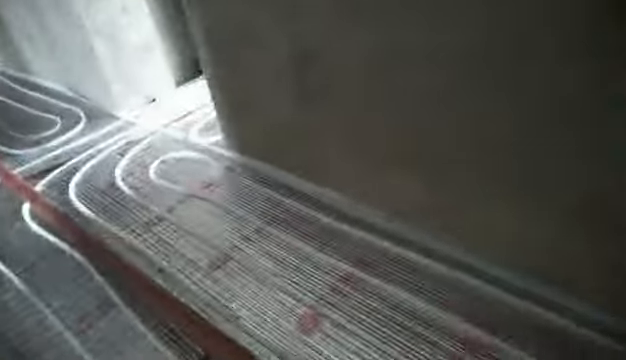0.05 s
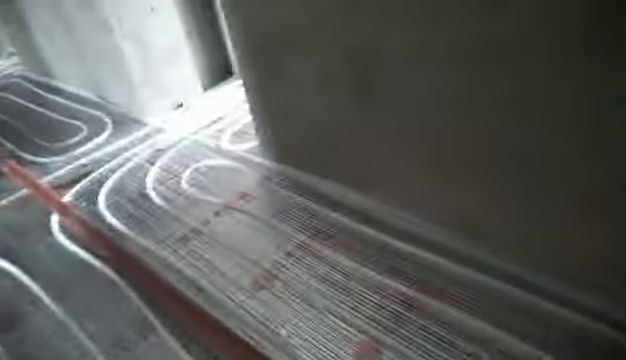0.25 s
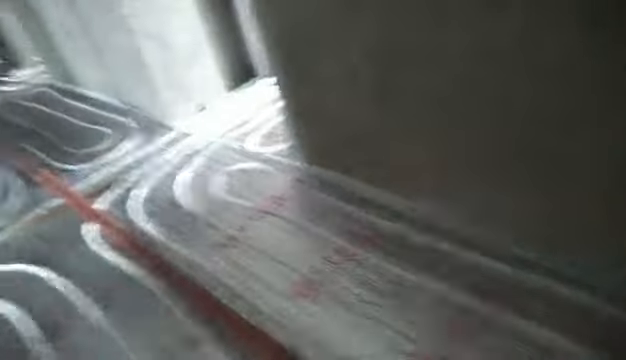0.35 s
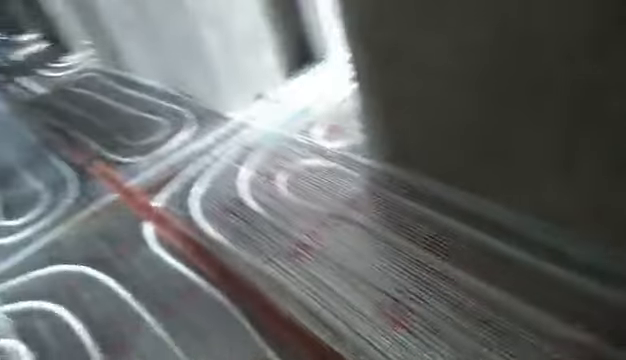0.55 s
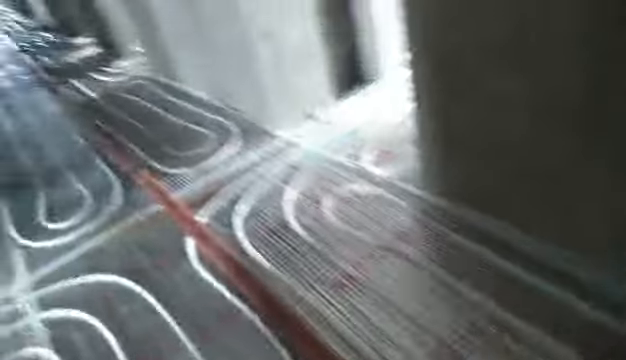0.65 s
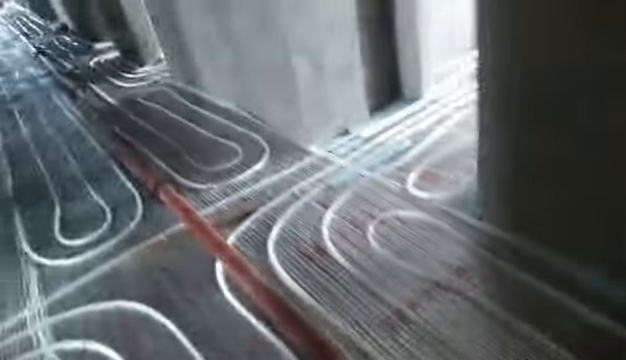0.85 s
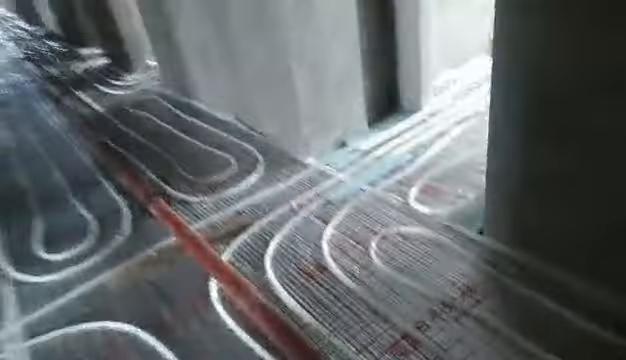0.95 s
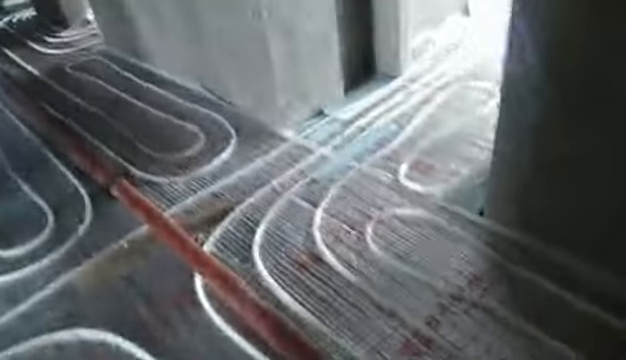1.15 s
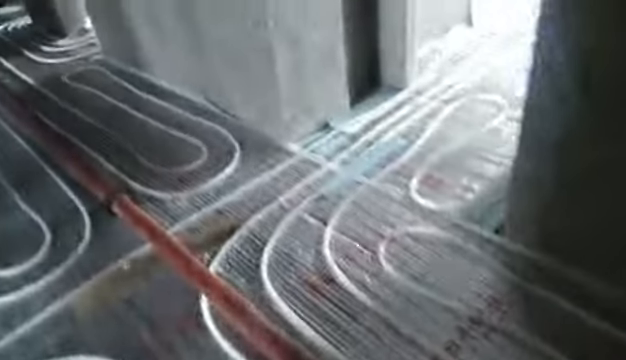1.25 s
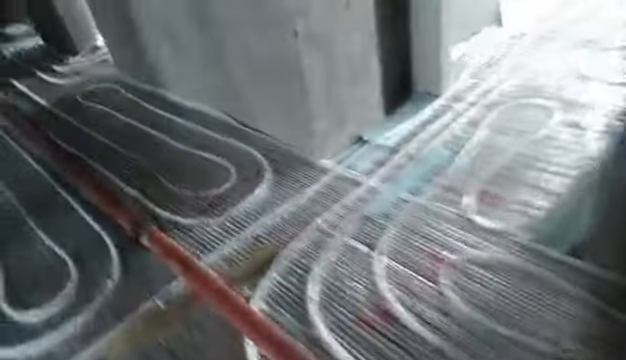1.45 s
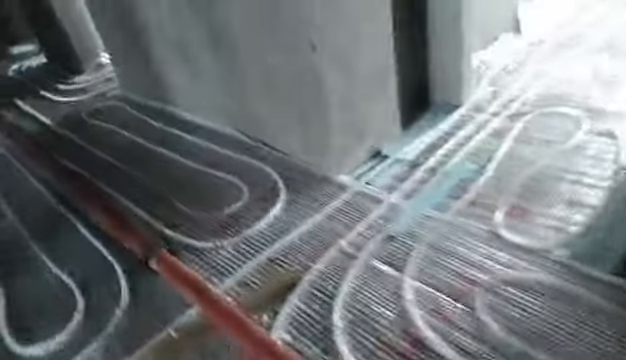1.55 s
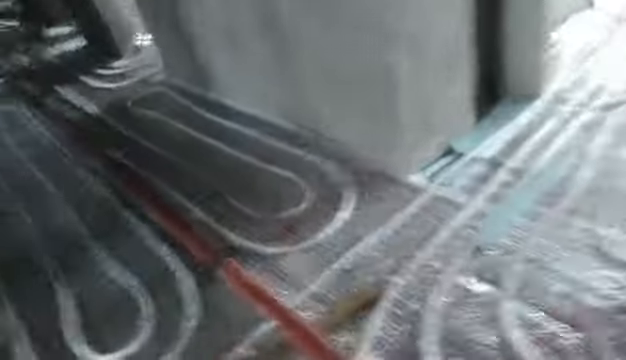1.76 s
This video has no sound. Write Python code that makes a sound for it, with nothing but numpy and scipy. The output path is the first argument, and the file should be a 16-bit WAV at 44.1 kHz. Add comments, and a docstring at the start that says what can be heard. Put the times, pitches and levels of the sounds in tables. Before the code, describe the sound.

Wet concrete is pumped through a hose, off to the left in a bare room. A valve clacks with a puff of air at 0.2 seconds. The hose groans around 0.5, then knocks, rumbles and squelches, with air spurting at 0.7 and leaking on. At 1.3 seconds comes a harder ringing clack and air blast, and grit scrapes along the humming hose until 1.8, over faint distant machinery.

```python
"""One slug of wet concrete, pumped through a hose across the floor of a bare concrete building.
A valve clacks with a puff of air; the hose groans, then knocks and rumbles as the slug squelches past;
air spurts and leaks on. A second, harder clack and blast leave grit scraping along the humming hose.
Heard from a closely spaced pair of microphones, everything to the left, machinery in the distance."""
import sys
import numpy as np
from scipy import signal
from scipy.fft import rfft, irfft
from scipy.io import wavfile
from scipy.ndimage import uniform_filter1d

SR = 44100
rng = np.random.default_rng(int(sys.argv[2]) if len(sys.argv) > 2 else 0)


def unload_wav(signal):
    """Save mono or channel-first audio to the path in sys.argv[1] as 16-bit WAV at rate SR, clipped to [-1, 1]."""
    wavfile.write(
        sys.argv[1],
        SR,
        np.round(np.clip(np.atleast_2d(signal).T, -1, 1) * 32767).astype(np.int16),
    )


N = 79380
T = np.arange(N) / SR
FREQS = np.maximum(np.fft.rfftfreq(2 * N, 1 / SR), 1)


def undb(db):
    """Decibels to gain."""
    return 10 ** (np.asarray(db) / 20)


def unit(x):
    """Scale to rms 1."""
    return x / np.sqrt(np.mean(x ** 2))


def curve(rows, column=1):
    """One column of a time table, joined by straight lines."""
    rows = np.array(rows)
    return np.interp(T, rows[:, 0], rows[:, column])


def across(points):
    """A table of freq_hz, value spread over log frequency."""
    points = np.array(points)
    return np.interp(np.log(FREQS), np.log(points[:, 0]), points[:, 1])


def shape(x, gain):
    """Filter by a gain per frequency."""
    return irfft(rfft(x, 2 * N) * gain)[..., :N]


def colour(x, spectrum):
    """Causal filter from a table of freq_hz, level_db."""
    cepstrum = irfft(np.log(undb(across(spectrum))))
    cepstrum[1:N] *= 2
    cepstrum[N + 1:] = 0
    return shape(x, np.exp(rfft(cepstrum)))


def resonances(rows):
    """Summed frequency response of damped resonances."""
    return sum(undb(db) / (1 + 2j * (FREQS - hz) / width) for hz, width, db in rows)


def mic_pair(pair):
    """Make two unrelated signals alike in the bass, as at two closely spaced microphones."""
    # likeness of left and right: freq_hz, correlation
    likeness = [(100, 0.92), (300, .95), (700, .6), (1500, 0.12), (8000, 0.12)]
    alike = np.clip(across(likeness), 0, 1)
    mid = shape(pair[0], np.sqrt((1 + alike) / 2))
    side = shape(pair[1], np.sqrt((1 - alike) / 2))
    return np.array([mid + side, mid - side])


def noise(spectrum):
    """Diffuse coloured noise, rms 1."""
    return unit(colour(mic_pair(rng.standard_normal((2, N))), spectrum))


def wander(rate_hz):
    """Smooth random drift, spread near 1."""
    span = max(int(SR / rate_hz), 1)
    steps = np.repeat(rng.standard_normal(N)[:N // span + 1], span)
    return 1.3 * uniform_filter1d(uniform_filter1d(steps, span), span)[:N]


def fade(start, decay_s):
    """Sudden start and exponential decay."""
    return (T >= start) * np.exp(-np.maximum(T - start, 0) / decay_s)


def room(x, wet_db, t60_s=0.41, build_s=0.015):
    """Direct sound plus the echo of bare concrete walls."""
    build = 1 - np.exp(-(T / build_s) ** 2)
    tail = mic_pair(rng.standard_normal((2, N))) * undb(-60 * T / t60_s) * build
    return x + undb(wet_db) * shape(x, rfft(unit(tail) / np.sqrt(N), 2 * N))


def machinery(level_db=-63):
    """Distant machinery lays a steady low noise under everything."""
    # machinery spectrum: freq_hz, level_db
    spectrum = [(25, 17), (55, 9.5), (110, -12), (400, 2), (750, -5), (1200, -3), (1600, -9), (2100, -5.5),
                (3200, -10.5), (7000, -11), (10000, -20.5), (14000, -28)]
    return undb(level_db) * noise(spectrum)


def air_leak():
    """A thin leak hisses at the coupling."""
    # strength of the leak: time_s, level_db
    levels = [(0, -98), (0.3, -76), (0.39, -62), (0.47, -82), (0.63, -69), (0.69, -59.5), (0.76, -42),
              (0.95, -56), (1.2, -57.5), (1.55, -55.5), (1.72, -54.5), (1.8, -58.5)]
    # hiss spectrum: freq_hz, level_db
    spectrum = [(500, -18), (1600, -7), (2300, -2), (3200, -9), (4800, -3.5), (5300, 4), (5900, -0.5),
                (6500, -10), (7300, -11.5), (8200, -17.5), (14000, -27)]
    return noise(spectrum) * undb(curve(levels) + 0.49 * wander(25))


def air_bursts(shut_s=0.03):
    """Escaping air swells, holds and falls away, cut short when the valve shuts."""
    # bursts of air: start_s, attack_s, hold_s, fall_db_per_s, level_db, open_s
    bursts = [(0.204, 0.012, 0.024, 179, -41, 0.31), (0.723, 0.037, 0.015, 61, -37.5, 0.362),
              (1.294, 0.036, 0.0057, 153, -29, 0.2)]
    # one spectrum per burst: freq_hz, level_db
    spectra = [
        [(100, 0), (400, -1.5), (900, 8.5), (1200, -1.5), (2000, 8.5), (2700, -3), (3800, -3.5), (5200, -9.5),
         (6700, -3), (10000, -2.5), (14000, -12.5)],
        [(200, -1), (900, -40), (1700, -8), (2400, -5.5), (3300, -10.5), (4800, -8.5), (5400, 0.5), (7000, 0),
         (10500, -5.5), (14000, -15.5)],
        [(150, -3), (450, -26), (900, -9), (1300, 4), (2000, -7), (2700, -5), (4700, -3), (5400, 0), (7600, -2),
         (10500, -5.5), (14000, -15)],
    ]
    air = 0
    for (start, attack, hold, fall, db, open_s), spectrum in zip(bursts, spectra):
        rise = np.clip((T - start) / attack, 0, 1)
        level = undb(db - fall * np.maximum(T - start - attack - hold, 0))
        shut = np.exp(-np.maximum(T - start - open_s, 0) / shut_s)
        air = air + rise * level * shut * noise(spectrum)
    return air * undb(0.8 * wander(220))


def steel_ring(centre_hz, span_octaves=0.45):
    """The steel's modes ring, strongest around the pitch that the blow favours."""
    # modes of valve and coupling: pitch_hz, level_db, t60_s
    modes = [(1394, -4, 0.11), (1400, -21, 0.19), (1365, -3.5, .14), (1507, -9.5, 0.15), (1792, -26, .15),
             (1812, -6, 0.15), (1876, -3, 0.11), (2008, 1.5, 0.053), (2020, -1, 0.06), (2204, -3, 0.12),
             (2120, 0, .18), (2890, -10, 0.13)]
    weights = [undb(db) / (1 + (np.log2(hz / centre_hz) / span_octaves) ** 4) for hz, db, _ in modes]
    ring = sum(weight * undb(-60 * T / t60) * np.sin(2 * np.pi * (hz * T + rng.random((2, 1))))
               for weight, (hz, _, t60) in zip(weights, modes))
    return ring / np.sqrt(np.sum(np.square(weights)) / 2)


def valve(crack_s=0.0028, thud_s=0.014, contact_s=0.0058):
    """Each clack is a sharp crack, a dull thud and a chattering contact that rings the steel."""
    # clacks and rebounds: start_s, crack_db, ring_db, ring_centre_hz, thud_db
    clacks = [(0.2069, -50.5, -38.5, 2100, -41.5), (0.2213, -54, -41.5, 1880, -50),
              (1.3033, -21, -26.5, 1820, -60), (1.3085, -27.5, -38, 1930, -50),
              (1.318, -31, -29, 1430, -35)]
    # spectra of crack and thud: freq_hz, level_db
    crack_spectrum = [(600, -39), (1500, 6), (2100, -4), (3000, -25), (4500, -12.5), (5600, 3), (8500, -2),
                      (14000, -11)]
    thud_spectrum = [(80, 0), (300, 0), (800, -1.5), (1100, -5), (2000, -20)]
    crack, thud = noise(crack_spectrum), noise(thud_spectrum)
    blows, rings = 0, 0
    for start, crack_db, ring_db, centre_hz, thud_db in clacks:
        blows = blows + undb(crack_db) * crack * fade(start, crack_s)
        blows = blows + undb(thud_db) * thud * fade(start, thud_s)
        chatter = unit(rng.standard_normal((2, N)) * fade(start, contact_s)) / np.sqrt(N)
        rings = rings + undb(ring_db) * shape(chatter, rfft(steel_ring(centre_hz), 2 * N))
    return room(blows, wet_db=-3) + room(rings, wet_db=-5.5)


def wall_tone(rows, unrest, jitter=0.022, flutter_db=4.2):
    """The hose wall sticks and slips: a tone with weak overtones; unrest scales jitter and flutter."""
    pitch_hz = curve(rows) * (1 + unrest * jitter * wander(90))
    phase = 2 * np.pi * np.cumsum(pitch_hz) / SR
    tone = np.sin(phase) + undb(-25.5) * np.sin(2 * phase) + undb(-41) * np.sin(3 * phase)
    sounding = (T > rows[0][0]) & (T < rows[-1][0])
    return unit(tone) * sounding * undb(curve(rows, column=2) + unrest * flutter_db * wander(70))


def hose_hum(upper_ratio=1.29, upper_db=-12.5):
    """The emptied hose hums on two resonances, steadier than its groan."""
    # lower resonance: time_s, pitch_hz, level_db
    lower = [(1.219, 269.8, -53.5), (1.282, 266, -55), (1.332, 265.3, -37), (1.39, 258.8, -48),
             (1.44, 260.8, -55), (1.495, 259.4, -38), (1.56, 264.1, -42), (1.62, 255.2, -43),
             (1.702, 263.7, -48), (1.8, 264, -68)]
    upper = [(s, hz * upper_ratio, db + upper_db) for s, hz, db in lower]
    return wall_tone(lower, unrest=0.5) + wall_tone(upper, unrest=0.5)


def hose_groan():
    """The hose wall groans in stick-slip surges."""
    # course of the groan: time_s, pitch_hz, level_db
    groan = [(0.325, 292.3, -59), (0.365, 298.7, -52.5), (0.38, 300.4, -37), (0.42, 292, -54),
             (0.46, 286.2, -26.5), (0.488, 276, -47), (0.505, 284.5, -28), (0.52, 282.4, -44),
             (0.535, 275, -22), (0.552, 276.6, -61), (0.7, 285.5, -59), (0.95, 292.5, -46)]
    return wall_tone(groan, unrest=1)


def hose_knocks(rise_s=0.0051, thump_s=0.01, slap_s=0.009, slap_db=-8.5):
    """The heavy hose jerks against the floor: quickly damped thumps, each with a dull slap."""
    # knocks on the floor: start_s, level_db, pitch_hz
    knocks = [(0.539, -27.5, 83.5), (0.596, -30, 86), (0.648, -24.5, 69), (0.799, -26, 84),
              (0.83, -38.5, 80.2), (0.877, -24, 67.95), (0.936, -30.5, 61.3), (0.973, -28, 52.6),
              (0.991, -31, 61), (1.029, -28, 63.6), (1.062, -27.5, 64), (1.084, -29, 69.7),
              (1.199, -30, 63), (1.336, -30, 91.5), (1.396, -30.5, 76)]
    # slap spectrum: freq_hz, level_db
    slap_spectrum = [(70, -12), (150, 12.5), (250, -3), (420, -17), (1000, -53)]
    slap_noise = undb(slap_db) * noise(slap_spectrum)
    sound = 0
    for start, db, hz in knocks:
        age = np.maximum(T - start, 0)
        rise = 1 - np.exp(-(age / rise_s) ** 2)
        push = rise * np.exp(-age / thump_s)
        thump = push / push.max() * np.sin(2 * np.pi * hz * age)
        slap = rise * np.exp(-age / slap_s) * slap_noise
        sound = sound + undb(db) * (slap - thump)
    return sound


def grit(ticks_per_s=5000, spread_db=3):
    """Dense random ticks of stones against the hose wall."""
    ticks = (rng.random((2, N)) < ticks_per_s / SR) * rng.choice([-1, 1], (2, N))
    return ticks * undb(spread_db * rng.standard_normal((2, N)))


def squelches(relative_width=0.46):
    """Air and wet grit squeeze through a gap whose resonance glides with its size."""
    # one glide per squelch: time_s, resonance_hz, level_db
    glides = [
        [(0.28, 1000, -75), (0.345, 940, -46.5), (0.39, 1134, -49.5), (0.415, 1760, -55), (0.45, 1740, -70)],
        [(0.45, 241, -53), (0.525, 206.3, -38.5), (0.62, 185.6, -43), (0.7, 170.6, -47.5), (0.82, 155.9, -40.5),
         (0.9, 160.3, -55)],
        [(0.57, 1406, -63.5), (0.62, 1596, -57.5), (0.67, 2004, -59), (0.715, 2700, -57), (0.76, 2800, -83)],
        [(0.745, 1300, -63), (0.788, 1600, -45), (0.815, 2100, -45.5), (0.842, 2570, -42.5), (0.88, 2530, -59),
         (0.95, 2533, -68)],
        [(1.312, 1671, -42), (1.325, 1449, -33), (1.36, 1250, -47), (1.42, 1000, -39.5), (1.5, 857, -60)],
    ]
    sound = 0
    for rows in glides:
        width_hz = relative_width * np.mean([hz for _, hz, _ in rows])
        spray = shape(grit(), 1 / (1 + (2 * FREQS / width_hz) ** 2) / (1 + (FREQS / (2 * width_hz)) ** 4))
        phase = 2 * np.pi * np.cumsum(curve(rows)) / SR
        squelch = mic_pair(spray * np.sin(phase))  # centres the spray on the resonance
        sounding = (T > rows[0][0]) & (T < rows[-1][0])
        sound = sound + unit(squelch) * sounding * undb(curve(rows, column=2))
    return sound


def slug_churn():
    """Stones churn in the slug and excite the low resonances of the hose."""
    # hose resonances: pitch_hz, width_hz, level_db
    modes = [(240, 23, -27), (292.8, 13, 6.5), (345, 42, -5), (396.6, 17, 1.5), (445.8, 23.3, -0.5),
             (542, 22, -9.5)]
    # strength of the churning: time_s, level_db
    levels = [(0, -72), (0.14, -81), (0.17, -63.5), (0.35, -69), (0.38, -34.5), (0.42, -39), (0.47, -32.5),
              (0.535, -35), (0.57, -39.5), (0.82, -42.5), (0.95, -54.5), (1.25, -64.5), (1.33, -52.5),
              (1.52, -56), (1.8, -66.5)]
    body = resonances(modes) / (1 + (FREQS / 900) ** 4) / (1 + (200 / FREQS) ** 6)
    return unit(shape(mic_pair(grit()), body)) * undb(curve(levels))


def slug_scrape(pipe_db=-4.5):
    """Grit scrapes the hose wall: a broad rasp plus narrow pipe resonances."""
    # strength of the scraping: time_s, level_db
    levels = [(0.2, -91), (0.29, -68), (0.35, -53.5), (0.55, -51), (0.68, -52.5), (0.9, -77), (1.3, -68),
              (1.35, -47), (1.45, -41.5), (1.57, -45.5), (1.68, -48.5), (1.8, -57)]
    # rasp spectrum: freq_hz, level_db
    spectrum = [(300, -26.5), (560, -11.5), (680, 0.5), (770, 4.5), (850, 1.5), (940, 2), (1090, -4.5),
                (1250, -1), (1500, -21.5), (2100, -16.5), (3500, -27), (9000, -58)]
    # pipe resonances: pitch_hz, width_hz, level_db
    modes = [(772, 14, 6), (846, 29, -3.5), (914, 30, 3), (967, 9.9, -2.5), (1266, 38, -4.5)]
    rasp = unit(colour(mic_pair(grit()), spectrum))
    pipe = unit(shape(colour(mic_pair(grit()), spectrum), resonances(modes)))
    return (rasp + undb(pipe_db) * pipe) * undb(curve(levels) + wander(60))


def slug_rumble():
    """The moving slug rumbles on the floor."""
    # strength of the rumble: time_s, level_db
    levels = [(0, -67.5), (0.2, -75.5), (0.4, -58), (0.5, -47), (0.56, -48.5), (0.7, -36.5), (0.76, -46),
              (0.9, -39), (1.09, -45), (1.14, -44.5), (1.3, -43), (1.42, -38.5), (1.5, -58), (1.62, -47.5),
              (1.8, -61)]
    # rumble spectrum: freq_hz, level_db
    spectrum = [(20, -13.5), (36, -23.5), (50, 5.5), (100, 6), (125, -0.5), (180, -2.5), (250, -12.5),
                (320, -9), (450, -48.5)]
    return noise(spectrum) * undb(curve(levels))


def scene():
    """All sources lie to the left in the bare room; the right microphone is shaded from the treble."""
    # balance at the microphones: freq_hz, left_minus_right_db
    balance = [(60, 5.4), (200, 6), (700, 4.9), (1300, 10), (2400, 11), (4400, 10.4), (8000, 17.5),
               (15000, 16.9)]
    hose = room(hose_groan() + hose_hum() + hose_knocks(), wet_db=-11.5)
    pump = valve() + air_bursts() + air_leak()
    slug = squelches() + slug_churn() + slug_scrape() + slug_rumble()
    lean = undb(across(balance))
    mic_gains = 2 * np.array([lean, np.ones_like(lean)]) / (1 + lean)
    return shape(machinery() + pump + hose + slug, mic_gains)


def record(dry, low_cut_hz=24.8, top_hz=14500):
    """The recorder sheds the deepest bass and cuts the top."""
    thinned = shape(dry, 1 / (1 + (low_cut_hz / FREQS) ** 6))
    return signal.sosfilt(signal.ellip(10, .2, 80, top_hz, fs=SR, output="sos"), thinned)


dry = scene()
out = record(dry)
unload_wav(out)
```